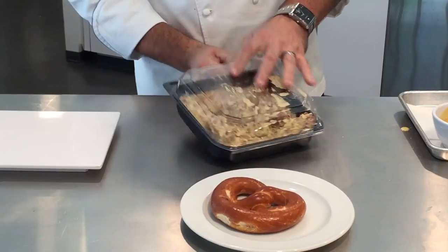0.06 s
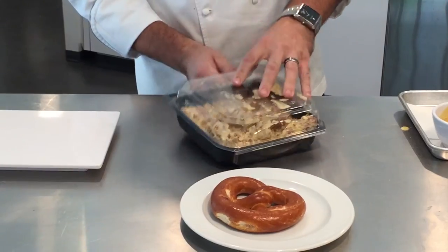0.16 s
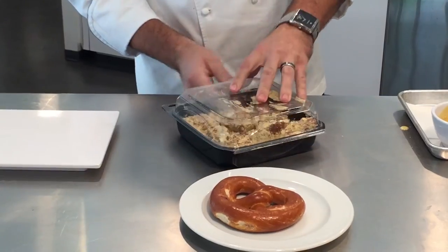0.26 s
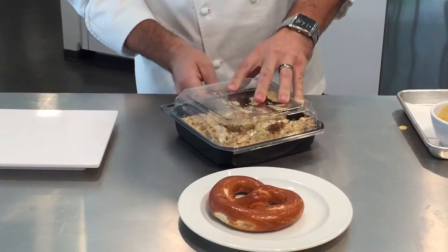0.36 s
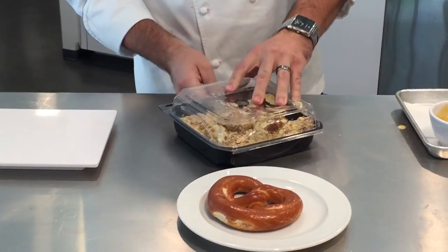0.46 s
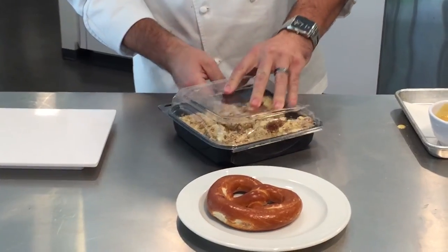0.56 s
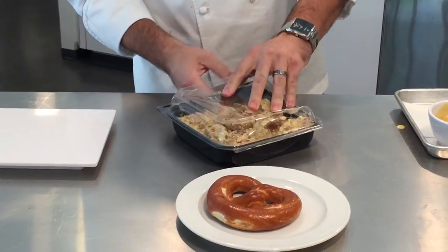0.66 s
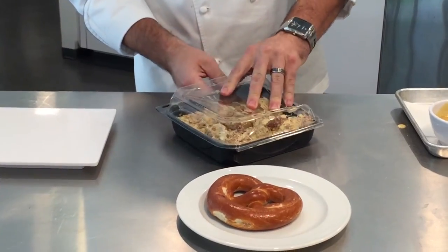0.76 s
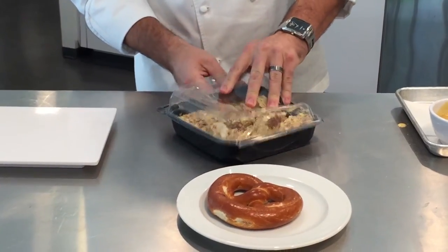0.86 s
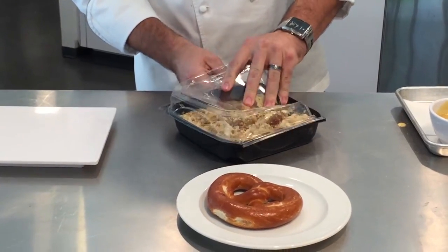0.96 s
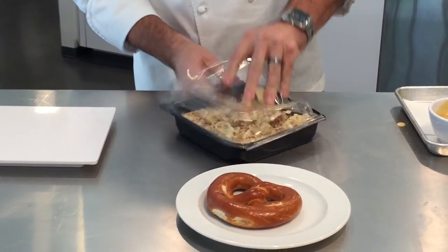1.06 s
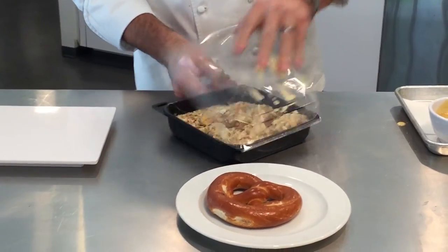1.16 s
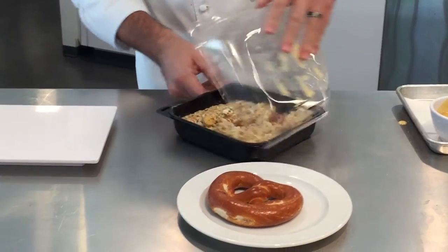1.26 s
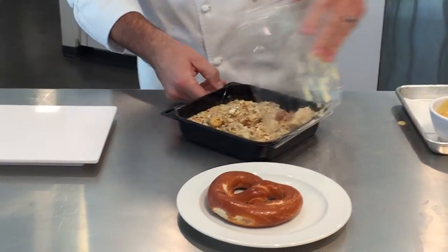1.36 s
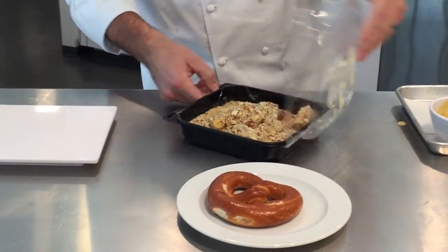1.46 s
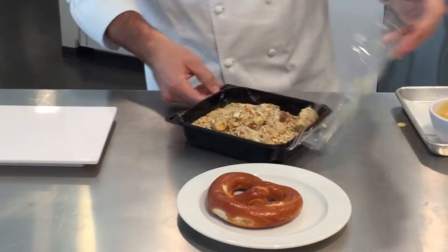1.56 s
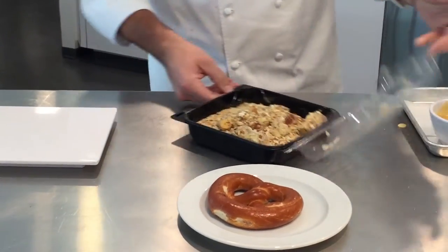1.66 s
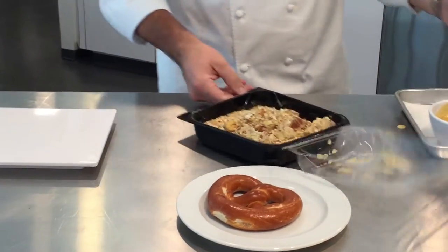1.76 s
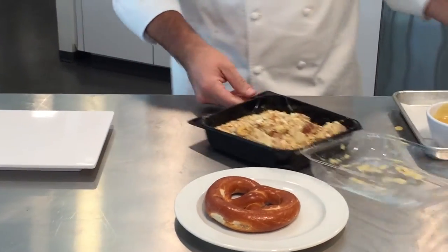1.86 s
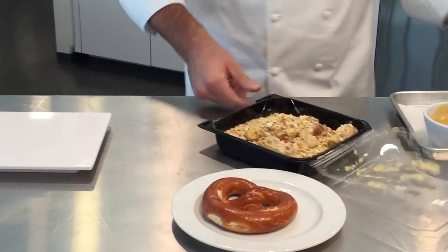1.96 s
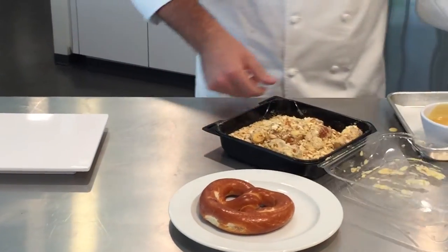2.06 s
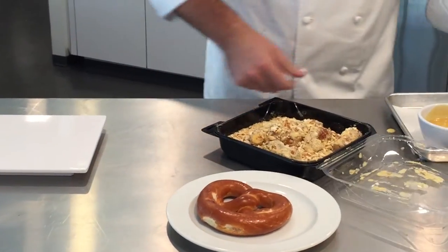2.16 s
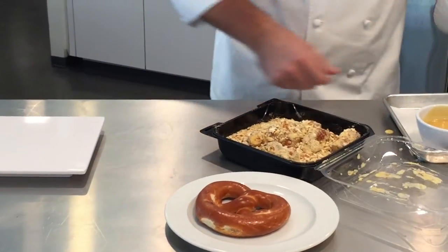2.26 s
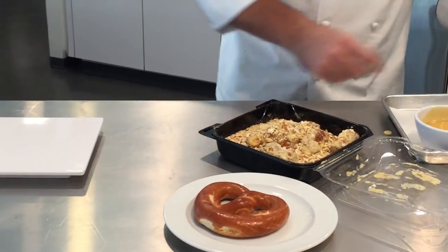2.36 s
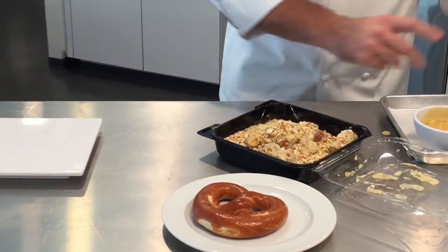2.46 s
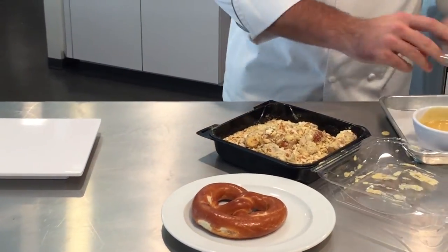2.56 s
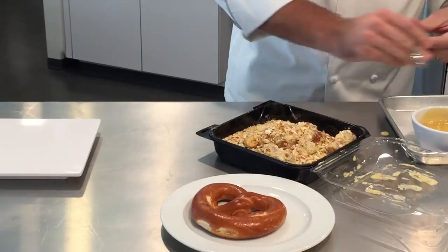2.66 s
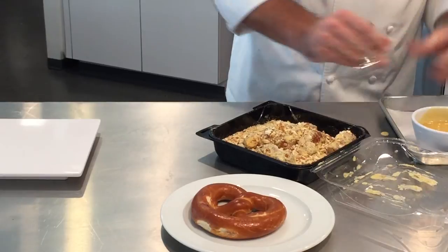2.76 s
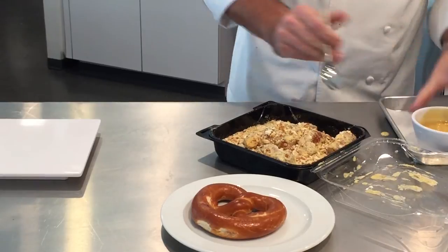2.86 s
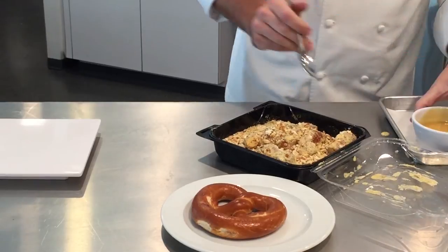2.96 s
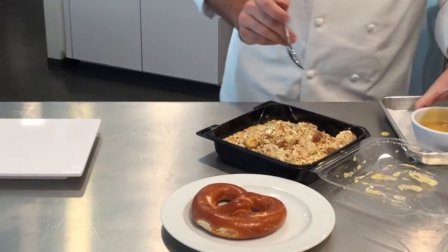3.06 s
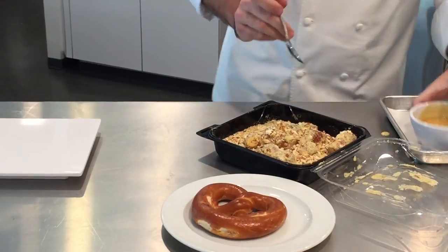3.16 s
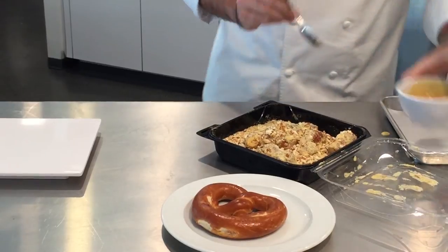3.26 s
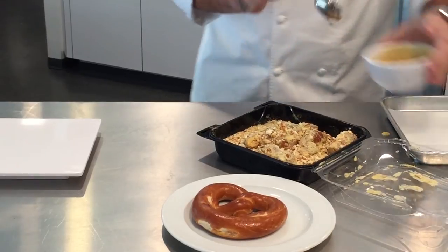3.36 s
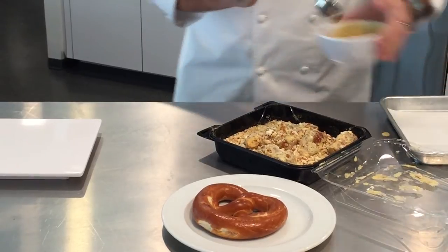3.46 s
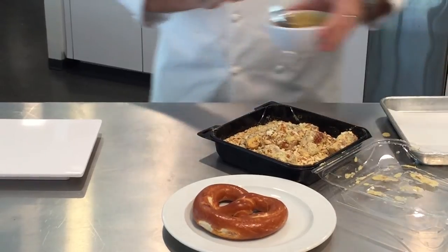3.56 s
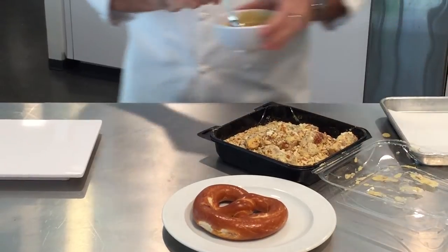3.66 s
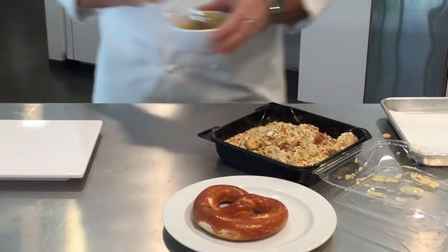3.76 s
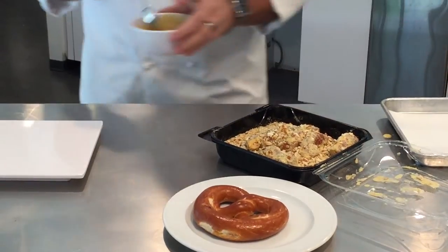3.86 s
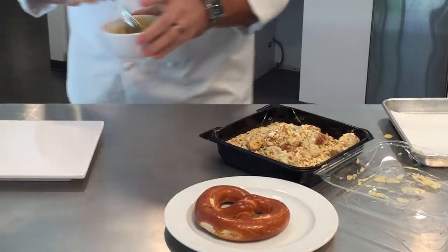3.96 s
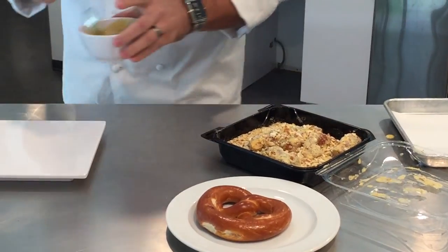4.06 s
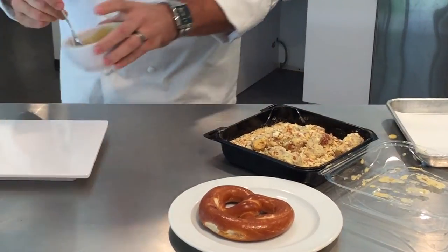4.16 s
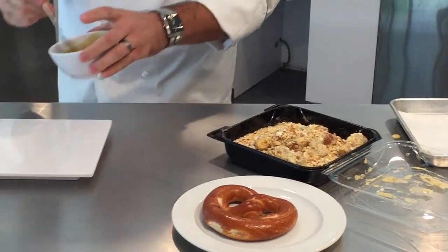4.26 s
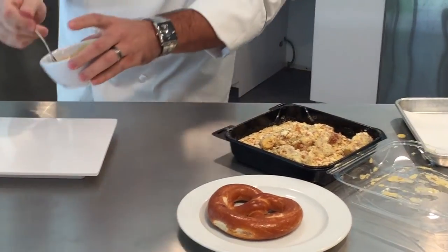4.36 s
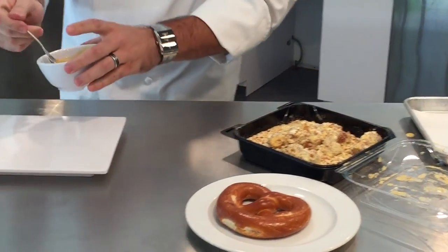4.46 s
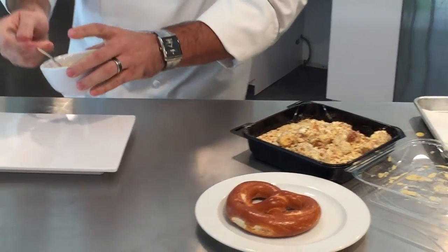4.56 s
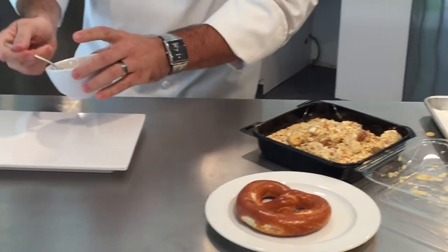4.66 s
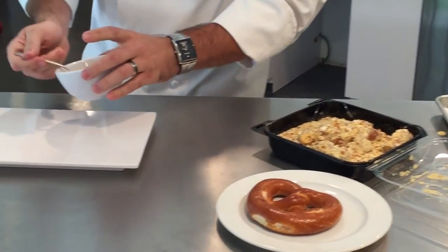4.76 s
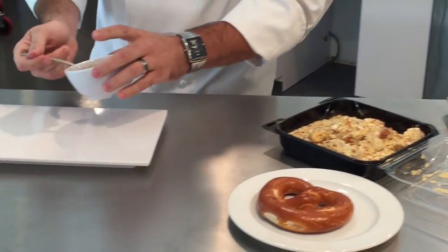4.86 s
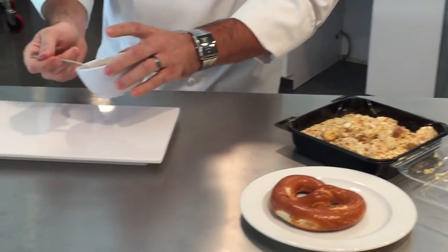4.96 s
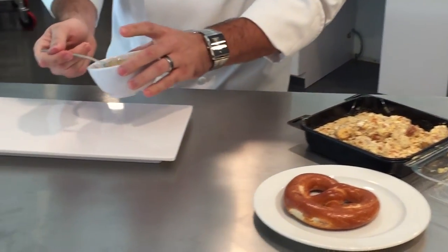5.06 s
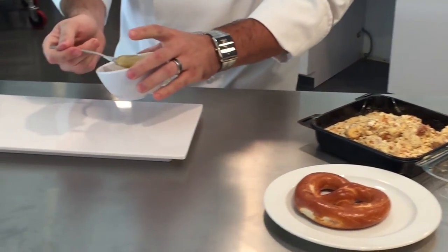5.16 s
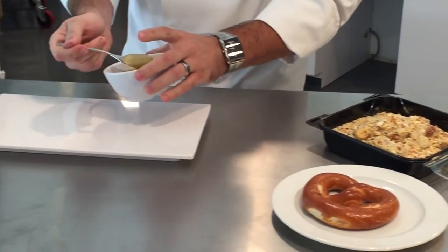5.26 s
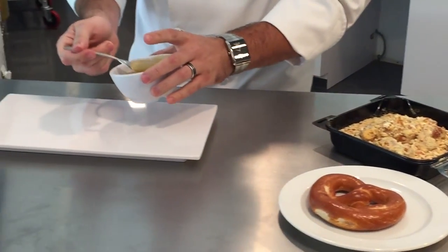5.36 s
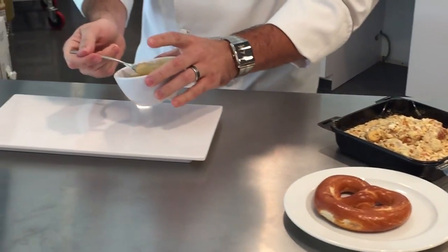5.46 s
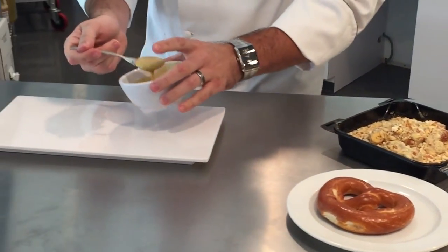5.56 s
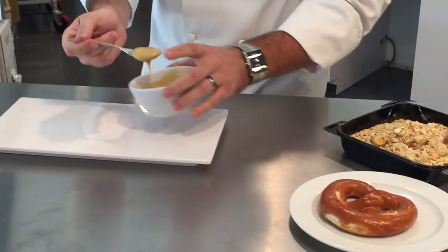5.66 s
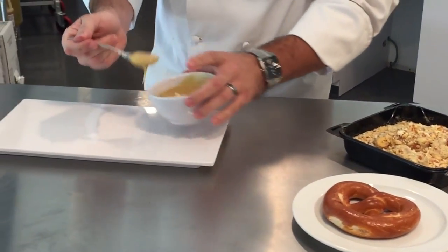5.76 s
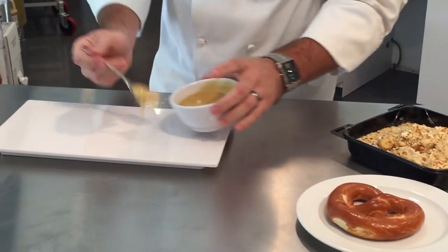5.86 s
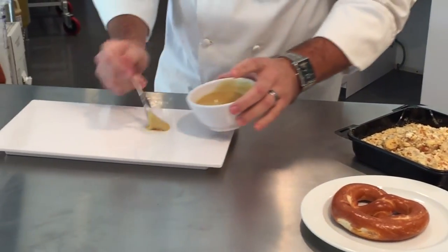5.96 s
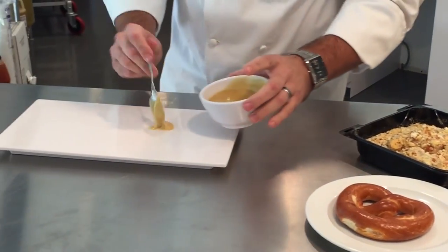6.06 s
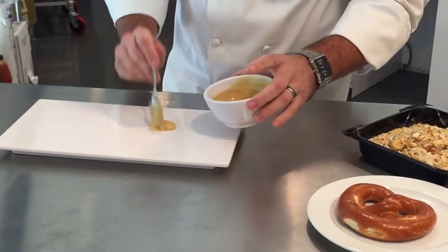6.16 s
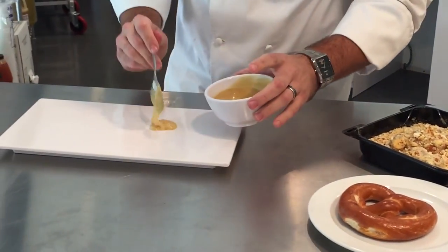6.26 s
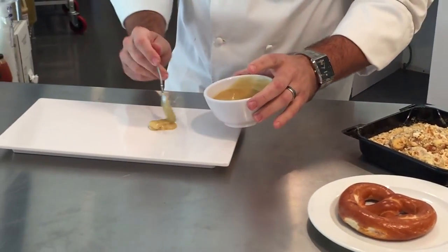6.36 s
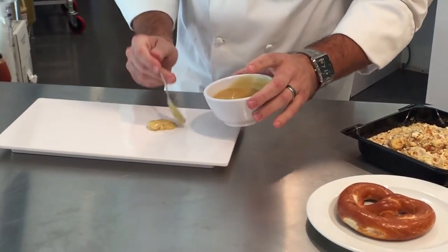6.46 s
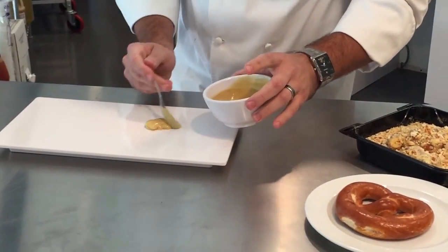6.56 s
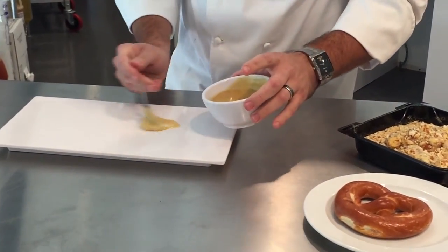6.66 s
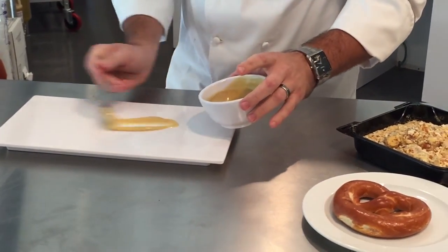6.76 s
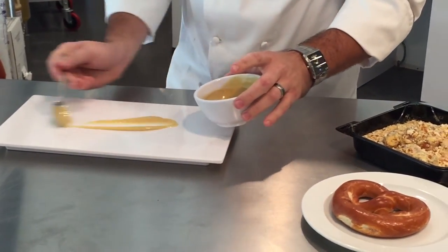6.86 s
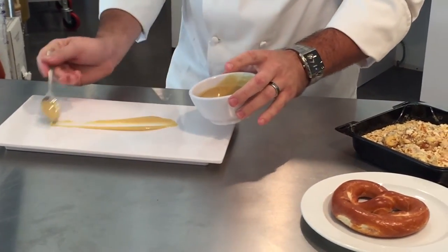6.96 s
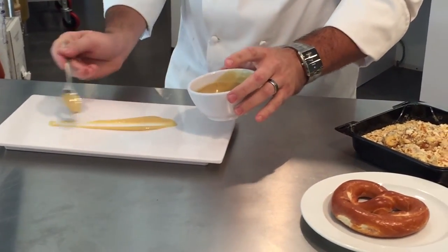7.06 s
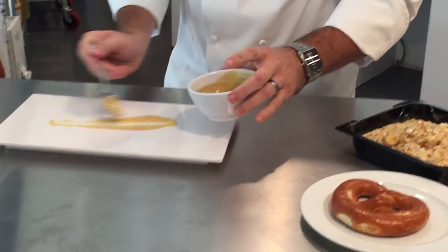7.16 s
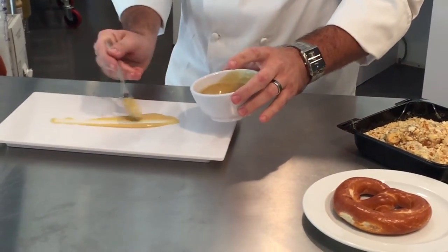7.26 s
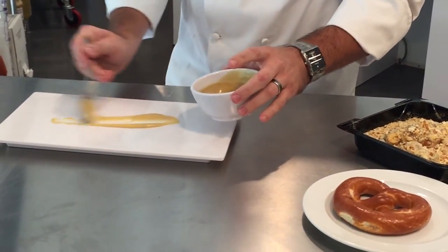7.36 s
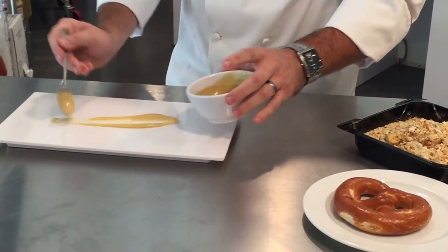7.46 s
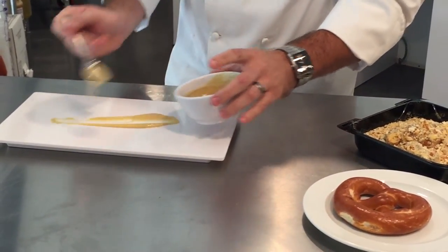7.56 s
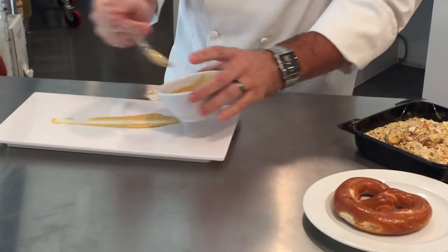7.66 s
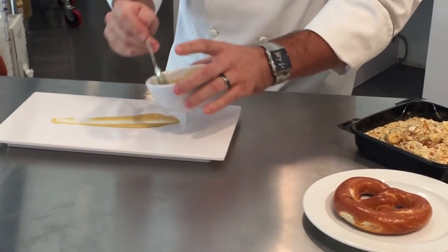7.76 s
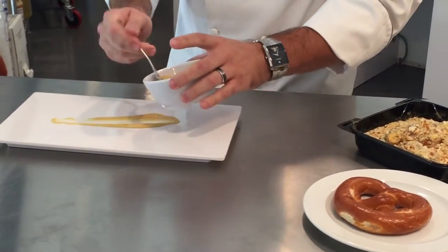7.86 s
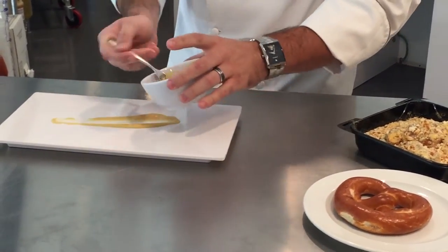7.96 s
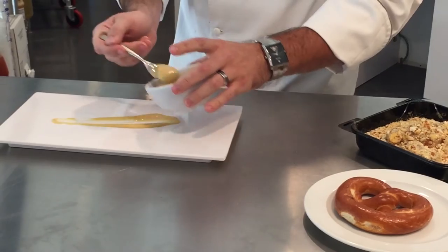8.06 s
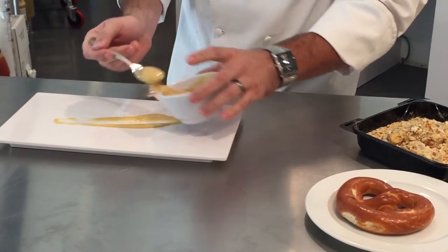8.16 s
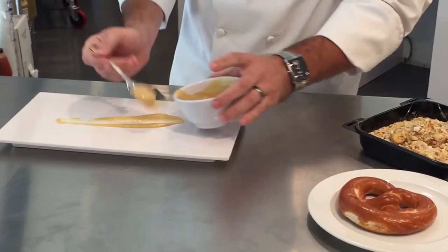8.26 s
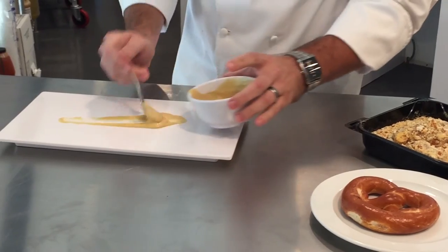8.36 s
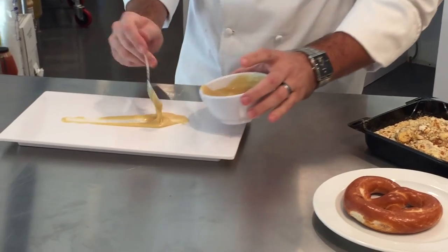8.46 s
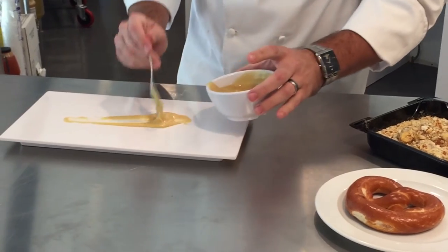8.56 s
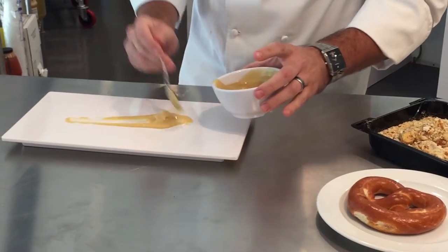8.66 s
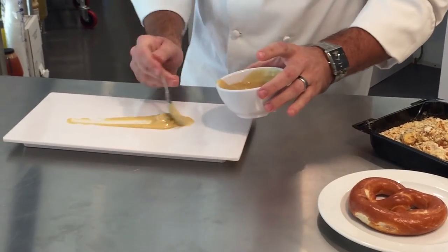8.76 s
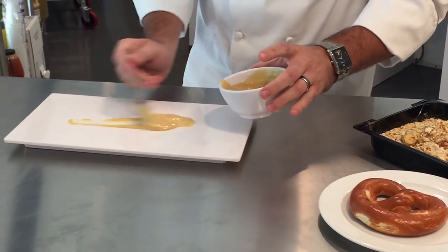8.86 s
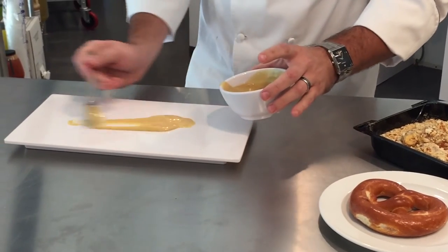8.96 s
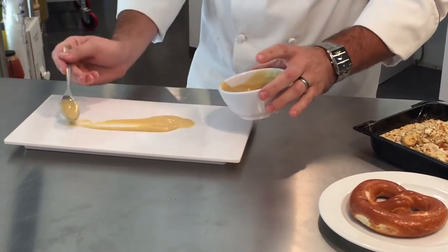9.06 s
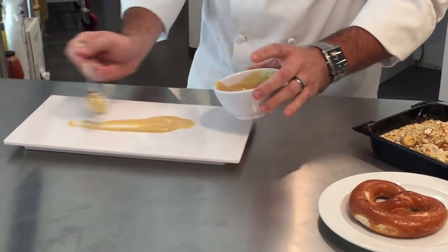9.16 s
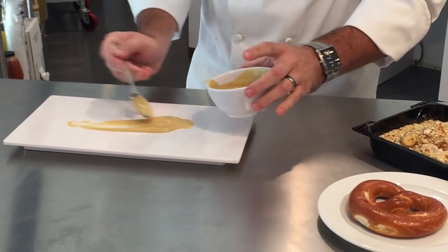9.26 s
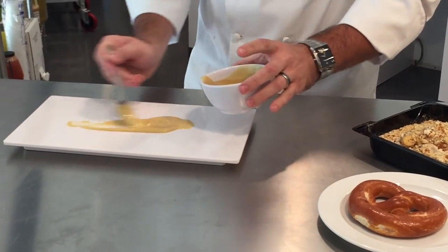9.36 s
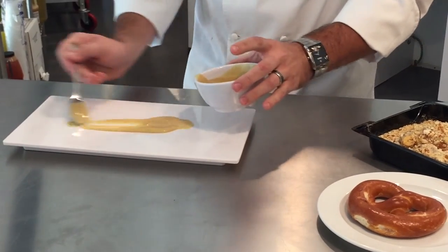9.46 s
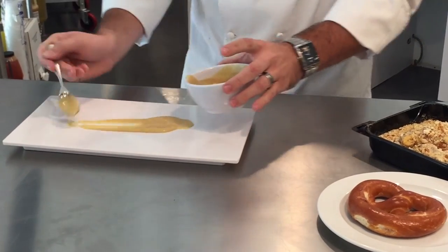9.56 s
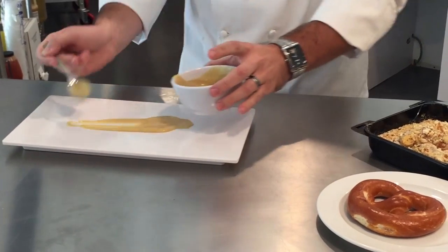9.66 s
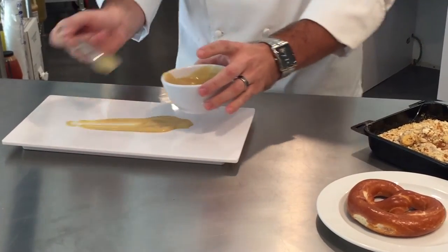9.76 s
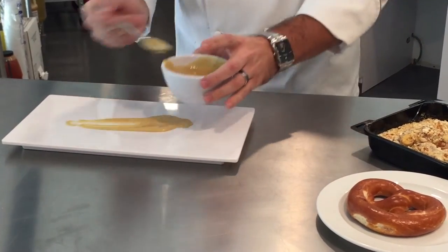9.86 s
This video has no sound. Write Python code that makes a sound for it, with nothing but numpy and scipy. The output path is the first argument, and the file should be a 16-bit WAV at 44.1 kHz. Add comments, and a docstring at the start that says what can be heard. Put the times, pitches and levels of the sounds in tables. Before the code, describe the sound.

Close-miked handling on a steel counter: brittle plastic crinkles, a burst of dry snaps as a tub lid comes free, then a light clatter and brief skid as it lands. Next come a few short metal-on-ceramic clinks, a long near-quiet stretch, a strong double spoon knock on crockery, and later softer taps. Steady low-level airy ventilation with a faint motor hum fills the reflective kitchen throughout.

```python
"""Plastic lid and crockery in a hard-walled kitchen

Close to the microphone a plastic lid is prised off a food tub, dropped on a steel counter and slides;
then a spoon clinks in a ceramic bowl, knocks on crockery and scrapes. Each blow is a rough contact that
rings decaying modes; creases are random ticks, slides are narrow bands of friction noise. Counter,
cupboards and far walls answer with decaying noise; ventilation hums and hisses behind it all."""
import sys
import numpy as np
from scipy import signal
from scipy.fft import rfft, irfft
from scipy.io import wavfile
from scipy.ndimage import uniform_filter1d

SR = 44100
rng = np.random.default_rng(int(sys.argv[2]) if len(sys.argv) > 2 else 0)


def file_out(sig):
    """Save sig as 16-bit WAV at sys.argv[1]."""
    # one column per channel
    cols = np.atleast_2d(sig).T
    # limit, then scale
    lim = np.clip(cols, -1, 1)
    pcm = np.round(lim * 32767).astype(np.int16)
    wavfile.write(sys.argv[1], SR, pcm)


N = 436590

# Ventilation air: (frequency [Hz], relative density [dB]); its overall level [dB rms]
AIR_SPECTRUM = [(18, -93), (30, -62.5), (92, -25.5), (132, -8.5), (247, -1.5), (374, -6), (460, -5.5),
                (612, -7.5), (837, -9.5), (1000, -12.5), (1340, -10.5), (2430, -17.5), (6530, -27),
                (8690, -31), (15000, -56)]
AIR_DB = -61.5
# Ventilation motor tones: (frequency [Hz], level [dB rms])
MOTOR_TONES = [(468, -68), (815, -73.5)]
# Hands flexing the lid, a dense crackle: (time [s], gain [dB])
CRACKLE_CURVE = [(0.0, -76), (0.17, -75), (0.29, -66.5), (0.368, -57.5), (0.498, -106), (0.67, -56),
                 (0.7, -90), (1.03, -91), (1.07, -73), (1.176, -65), (1.5, -74), (1.602, -55.5),
                 (1.748, -65), (1.95, -61), (2.116, -77), (2.2, -79)]

# Blows on each thing, levels before the room answers: (time [s], peak [dB], crack against the ring [dB],
# thud against body band [dB], click against body band [dB], edge against click [dB], favoured modes [Hz]...)
LID_SNAPS = [(0.054, -50.5, 3, 5, 1, -7, 456, 2804), (0.179, -33.5, 0.5, -17, -5, -8, 1030, 1588),
             (0.212, -40.5, 2, -14.5, 3.5, -8, 1177, 3150), (0.23, -45.5, 3, 0, 2, -7.5, 951.5, 3150),
             (0.257, -43, 1.5, 2, 3, -7.5, 898, 3150), (0.447, -35, -2.5, 5.5, -8, -7, 511, 900),
             (0.678, -22, 4.5, -5, 8.5, -7, 1855, 3150),
             (0.6795, -13, 5.5, 0.5, 9, -7.5, 507.5, 1855, 5040), (0.736, -25, 4, -9, 6, -6, 3150, 4300),
             (0.738, -18, 4, -5, -7, -8, 510, 1150, 1545), (0.774, -27.5, 1.5, -2, -8, -14, 597, 1800),
             (0.877, -18, 1.5, -14, -5, -8, 1540, 3150), (0.88, -14.5, 2.5, -11, 0.5, -8, 1052, 3700),
             (0.922, -19, 4, -8, 3, -7.5, 950, 3150), (0.924, -18.5, 3, 0, -4, -9, 615, 950),
             (1.02, -38, 4, -2, -14, -7.5, 610, 1550)]
TUB_SHIFTS = [(0.39, -49, -14, 0, -12, -4.5, 340, 494), (0.45, -32, 5, 6.5, -17, -11, 477, 1020),
              (0.458, -50, -7, -20.5, -17.5, 5, 520, 990), (0.499, -55, -15, 18, 4.5, -20, 510, 339),
              (0.529, -58, -9, 0, -3, -4.5, 490, 1000), (1.032, -41.5, -7, 11, -20, -15, 610, 524),
              (1.612, -37, -9, -7, -30, 2, 1150, 600), (1.679, -44, -10, -21, -30, 5, 980, 1100)]
LID_DROPS = [(1.545, -49, -6, 14, 3, -2, 336, 5700), (1.577, -48, 0, -10, -6, -9, 1706, 2040),
             (1.603, -25, -10, -26, -6.5, -5.5, 2040, 2698), (1.649, -42, 0, 0, -1, -6, 1020, 2710),
             (1.749, -49, 3, -30, 4, -3, 4470, 2340), (1.754, -46, -3, -30, -3, -6, 2040, 4470),
             (1.774, -53, 3, -26, -15, -5.5, 1140, 2040), (1.822, -44, 0, -17, -4, -6, 1140, 1706),
             (1.832, -36.5, 0, -35, -1, -3, 2340, 1140, 5100), (1.924, -38, 0, 0, -8, -9, 824, 1450, 3420),
             (1.946, -47, 5, -7, 2, -4, 818, 4470), (1.985, -53, 1, -10, 0, -9.5, 2040, 2710),
             (2.075, -39, 0, -2, -7, -11, 830, 1450, 3420), (2.098, -45, -3, -10, -12, -10, 1450, 830),
             (2.128, -51.5, 5, 3, -20, -13, 823, 1450)]
BOWL_CLINKS = [(3.733, -32.5, -6, -25, -12, -4, 1130, 2550), (3.741, -36, -14, -22, -14, -3, 1030, 2550),
               (3.916, -30.5, 1, -17, 13, 0, 4390, 6330, 1030), (3.922, -42, 2, -24, 20, 3, 7980, 9000),
               (3.927, -43, 2, -24, 20, 1, 4130, 4650, 9200),
               (3.947, -34.5, -16, -19, -8, -12, 1030, 3850, 4130),
               (4.155, -48, -8, -14, -5.5, -1, 1790, 3200), (4.347, -54.5, -2, -20, -3, -1, 1790, 2900),
               (4.515, -55, -8, -4, 5, -2, 4390, 9200), (9.863, -48.5, -5, -16, -2.5, -1, 1430, 4150)]
PLATE_KNOCKS = [(5.746, -28, -3, 0, 3, -6, 1555, 7760, 2900), (5.751, -28, -3, 2, 3.5, -8, 757, 1715, 4580),
                (5.93, -24, 12, -4, 6.5, -11, 1715, 2780, 380),
                (5.932, -16.5, 12, -7, 6.5, -13, 1715, 3250, 775),
                (5.934, -18, 14, -12, 6.5, -11, 2300, 6980, 3800),
                (7.122, -60, -10, -3, 4, -18, 4290, 4580, 5050),
                (8.153, -52, -15, 6, -9, -6, 766, 4240, 680), (8.53, -35, -11, -1, 5, -5, 2780, 4050, 7500),
                (8.534, -33.5, -15, 2, 4.5, -6, 690, 1150, 2900, 8070),
                (8.556, -46, -15, 6, 0, -4, 774, 5050, 4580)]
# Edges of the thud, body, click and edge bands: (frequency [Hz])
BLOW_EDGES_HZ = np.array([280, 900, 2100, 5400, 12000])

# Modes of each thing: (centre of a close pair [Hz], relative level [dB], t60 before limits [s])
LID_MODES = [(335, 1.5, 0.1), (510, 5, 0.061), (610, 2, 0.045), (741, 6, 0.012), (950, 2, 0.04),
             (1030, 3.5, .04), (1150, 2, 0.035), (1545, 1.5, 0.02), (1830, 0.5, 0.025), (2000, 0, .02),
             (2409, -0.5, 0.015), (2790, 0.5, 0.02), (3150, 1.5, 0.01), (3671, -4.5, 0.01),
             (4300, -4, 0.01), (5040, 0.5, .025), (6070, -1, 0.03), (7076, -8, 0.0092), (7600, -5, 0.018),
             (8300, -3, 0.014), (9600, -9.5, .015)]
LID_ON_STEEL_MODES = [(340, -3, .12), (594, -4, .08), (824, -6, .08), (1020, 0, 0.054), (1140, 1, 0.084),
                      (1450, -10.5, 0.036), (1706, 5, 0.046), (2040, 6, 0.023), (2340, 3.5, 0.019),
                      (2710, 2.5, 0.02), (3420, -8, 0.028), (4470, -6, 0.022), (5100, -1, 0.02),
                      (5700, -6, 0.02), (6900, -6, 0.019), (7600, -16, 0.023), (9200, 7, 0.018)]
BOWL_MODES = [(818, -20, 0.1), (1030, 9.5, 0.032), (1130, 2, 0.025), (1394, -3.5, 0.055),
              (1640, 0.5, 0.061), (1790, -2, .07), (2330, 1.5, 0.046), (2530, 4.5, 0.1), (2900, 0, 0.1),
              (3190, -1.5, 0.06), (3850, -2, .05), (4130, 3, 0.051), (4385, 2.5, 0.05), (4650, -1, .04),
              (4950, 2, 0.1), (5360, -2, .08), (5970, 1, .1), (6360, 4, 0.045), (7200, -7, 0.1),
              (7300, 1, 0.1), (7980, 4.5, 0.1), (8230, -9, .1), (9000, 6, 0.1), (9200, -3, 0.1),
              (10900, -12, .05), (11900, -5, 0.1)]
PLATE_MODES = [(380, -10.5, 0.07), (552, -9, 0.049), (680, -6, 0.077), (732, -7, 0.076), (774, -4, 0.07),
               (922, -10.5, .04), (1150, -6, 0.068), (1260, -11.5, .04), (1430, -9.5, 0.046),
               (1555, -5, 0.038), (1715, -4, 0.065), (2265, -8, 0.05), (2390, -8.5, 0.037),
               (2780, -7.5, 0.068), (2900, -5.5, 0.066), (3250, -10.5, 0.05), (3800, -8.5, .05),
               (4050, -7, .035), (4290, -6.5, .035), (4580, -4.5, .03), (5050, -6, 0.07), (5080, -6, 0.04),
               (6130, -14, .04), (6950, -12, .03), (7500, -2.5, .04), (7660, 0.5, .04), (7900, -1, .04),
               (8320, -4, .03), (8570, -8, .03)]

# Kinds of touch: (contact [ms], lowest pitch of the crack [Hz], wash [ms], broad wash [dB],
# wash around the modes against the ring [dB], grating against the clean strike [ratio],
# lift of the favoured modes [dB], loss at 10 kHz [dB])
SNAP_TOUCH = (0.75, 130, 5, -4.5, -12, 0.36, 6.5, 7.5)
SHIFT_TOUCH = (3, 150.5, 6.5, -2, -8, 3.0, 7, 9)
DROP_TOUCH = (1.4, 500, 4, -2, -9, 0.1, 11.5, 5.5)
CLINK_TOUCH = (0.4, 1000, 7, -11, -10, 0.1, 11, 6.5)
KNOCK_TOUCH = (0.36, 449.5, 12.5, -3, -8, 0.32, 7.5, 11)

# Friction bands of the sliding things: (frequency [Hz], width [Hz], gain [dB])
LID_SLIDE_BANDS = [(1930, 60, 5), (2450, 150, -5), (2950, 150, -3), (4800, 100, -11)]
SPOON_SCRAPE_BANDS = [(2900, 120, -2), (3530, 150, 5), (4150, 70, 13.5), (4700, 200, -8), (7100, 500, -6)]
# Course of each slide: (peak time [s], level [dB], rise [dB per s], fall [dB per s])
LID_SLIDE = (2.032, -55, 110, 700)
SPOON_SCRAPE = (7.195, -61, 250, 250)

# Room bands, levels before a weighting by pitch:
# (frequency [Hz], near surfaces [dB], far walls t60 [s], far walls [dB])
ROOM_BANDS = [(233.5, -12, 0.26, -7.5), (499.2, -7.5, 0.28, -12.5), (1069, -15, 0.8, -21),
              (2000, -16.5, 0.31, -14.5), (4140, -15, 1, -26.5), (7660, -7, 0.91, -20),
              (13000, -12, 0.2, -16.5)]

# cycles that limit a mode's ring, though never to less than 12 ms:
# thin plastic in the hand, let go, hand-held bowl, plate lying flat
PLASTIC_CYCLES, DROP_CYCLES, BOWL_CYCLES, PLATE_CYCLES = 26, 60, 260, 200
# reach of the lift around a favoured mode, as a share of its pitch
PLASTIC_FAVOUR, CROCKERY_FAVOUR = 0.06, 0.035
PAIR_SPLIT = 0.0055  # shift of each mode of a pair up or down, as a share of its pitch
BLUR_T60_S = 0.008  # neighbours of each mode die at least this fast, widening it into a band
NEAR_T60_S = 0.18  # echo of counter and cupboards
TOP_HZ = 15300


def undb(db):
    """Amplitude ratio from decibels."""
    return 10 ** (np.asarray(db) / 20)


def level(x, db):
    """Scale to an rms level in dB."""
    return x * undb(db) / np.sqrt(np.mean(x ** 2))


def colour(x, hz, db):
    """Filter by (Hz, dB) points joined on a log-frequency axis."""
    log_hz = np.log(np.maximum(np.fft.rfftfreq(len(x), 1 / SR), 1))
    gain = undb(np.interp(log_hz, np.log(hz), db))
    return irfft(rfft(x) * gain, len(x))


def band(x, hz, width):
    """Keep one resonant band, its width in Hz."""
    return signal.lfilter(*signal.iirpeak(hz, hz / width, fs=SR), x)


def walk(rate):
    """Random levels held 1 / rate s and slewed twice; spread near 1."""
    hold = int(SR / rate)
    steps = np.repeat(rng.standard_normal(N // hold + 1), hold)
    return 1.6 * uniform_filter1d(uniform_filter1d(steps, hold), hold)[:N]


def curve_gain(curve):
    """Gain from a level curve, silent outside it and smoothed over 10 ms."""
    t = np.arange(N) / SR
    db = np.interp(t, *np.transpose(curve), left=-200, right=-200)
    return uniform_filter1d(undb(db), size=441)


def ventilation():
    """Air noise that swells a little, with two wavering motor tones."""
    air = colour(rng.standard_normal(N), *np.transpose(AIR_SPECTRUM)) * undb(0.7 * walk(1.5))
    sound = level(air, AIR_DB)
    t = np.arange(N) / SR
    for hz, db in MOTOR_TONES:
        tone = np.sin(2 * np.pi * (hz * t + 0.08 * walk(5)))
        sound = sound + level(tone * undb(1.2 * walk(11)), db)
    return sound


def ring(modes, cycles, favoured_hz, favour_db, reach):
    """Answer of an object to one tap; the spot of contact favours modes near certain pitches."""
    # uneven walls split every mode into a close pair
    hz, db, t60 = np.repeat(modes, 2, axis=0).T[:, :, None]
    t = np.arange(SR // 8) / SR
    level_chance, pitch_chance = rng.standard_normal((2, len(hz), 1))
    order = np.arange(len(hz))[:, None]
    nearness = np.exp(-(np.log(hz / favoured_hz) / reach) ** 2).max(axis=1, keepdims=True)
    db = db + favour_db * nearness + 1.5 * level_chance
    longest = np.clip(cycles / hz, 0.012, 0.1)
    t60 = np.clip(t60, 0.01, longest)
    hz = hz * (1 + PAIR_SPLIT * (-1) ** order + 0.003 * pitch_chance)
    sign = (-1) ** (order // 2)  # alternates from pair to pair
    return np.sum(undb(db - 60 * t / t60) * sign * np.sin(2 * np.pi * hz * t), axis=0)


def flexed_lid_crackle(per_s=2500, spread_db=2.6):
    """Tiny creases of thin plastic, each a tick into the lid."""
    strength = undb(spread_db * rng.exponential(size=N)) * rng.standard_normal(N)
    ticks = (rng.random(N) < per_s / SR) * strength
    answer = ring(LID_MODES, PLASTIC_CYCLES, [2400], 6.5, PLASTIC_FAVOUR)
    body = signal.fftconvolve(ticks, answer)[:N]
    body = colour(body, [120, 300], [-25, 0])  # too small to move deep bass
    snap = colour(ticks, [300, 2500, 9000, 13000], [-12, 0, -14, -34])
    return (level(body, 0) + level(snap, -2)) * curve_gain(CRACKLE_CURVE)


def share_out(x, shares_db, bass_cut_db, top_loss_db):
    """Colour a sound towards a given energy share in each band; it fades steeply outside."""
    power = np.cumsum(np.abs(rfft(x)) ** 2)[BLOW_EDGES_HZ * len(x) // SR]
    db = shares_db - 10 * np.log10(np.diff(power))
    middle = np.sqrt(BLOW_EDGES_HZ[1:] * BLOW_EDGES_HZ[:-1])
    bass = [db[0] - bass_cut_db, db[0] - bass_cut_db / 5]
    top = [db[-1] - top_loss_db, db[-1] - 2.4 * top_loss_db]
    return colour(x, [120, 300, *middle, 10000, 15000], [*bass, *db, *top])


def blows(events, modes, cycles, touch, hard=False):
    """Each blow is a rough contact that rings the modes and cracks broadly; softer contacts swell more slowly."""
    contact_ms, low_hz, wash_ms, wash_db, blur_db, grating, favour_db, top_loss_db = touch
    reach, bass_cut_db = (CROCKERY_FAVOUR, 34) if hard else (PLASTIC_FAVOUR, 20)
    crack_filter = signal.butter(2, low_hz, "high", fs=SR, output="sos")
    lead = SR // 50  # room ahead of each blow for the colouring
    out = np.zeros(N + SR)
    ms = np.arange(SR // 8) * 1000 / SR
    swell = ms * np.exp(-ms / max(contact_ms, 0.15))
    for s, peak_db, crack_db, thud_db, click_db, edge_db, *favoured_hz in events:
        contact, rattle = rng.standard_normal((2, len(ms)))
        # one clean strike plus some rough grating, most in the tub shifts
        strike = swell == swell.max()
        push = strike + grating * contact * swell / np.linalg.norm(swell)
        answer = ring(modes, cycles, favoured_hz, favour_db, reach)
        tone = signal.fftconvolve(push, answer)
        # countless small modes blur into a noisy wash after the contact
        wash = rattle * np.cumsum(swell) * np.exp(-ms / wash_ms)
        blur = signal.fftconvolve(wash, answer * undb(-0.06 * ms / BLUR_T60_S))
        crack = level(contact * swell, 0) + level(wash, wash_db)
        crack = np.pad(crack, (0, len(tone) - len(ms)))
        crack = signal.sosfilt(crack_filter, crack)
        sound = level(tone, 0) + level(blur, blur_db) + level(crack, crack_db)
        sound = np.pad(sound, (lead, 0))
        # each blow has its own thud, click and edge balance
        shares_db = np.array([thud_db, 0, click_db, click_db + edge_db])
        sound = share_out(sound, shares_db, bass_cut_db, top_loss_db)
        peak = np.sqrt(np.max(uniform_filter1d(sound ** 2, size=132)))  # loudest 3 ms
        i = int(s * SR)
        out[i:i + len(sound)] += sound * undb(peak_db) / peak
    return out[lead:N + lead]


def lid_snaps():
    """Thin plastic held in the hand snaps off the tub, its ring soon damped."""
    return blows(LID_SNAPS, LID_MODES, PLASTIC_CYCLES, SNAP_TOUCH)


def tub_shifts():
    """Slower, grating contacts ring the same damped plastic."""
    return blows(TUB_SHIFTS, LID_MODES, PLASTIC_CYCLES, SHIFT_TOUCH)


def lid_drops():
    """The lid, let go, knocks on the steel counter and may ring for more cycles."""
    return blows(LID_DROPS, LID_ON_STEEL_MODES, DROP_CYCLES, DROP_TOUCH)


def scrape(bands, peak_s, level_db, rise_db_per_s, fall_db_per_s):
    """Fine friction noise in narrow bands of the thing that slides."""
    grit = rng.standard_normal(N) * undb(2.1 * walk(85))
    after = np.arange(N) / SR - peak_s
    press = undb(np.minimum(rise_db_per_s * after, -fall_db_per_s * after))
    friction = sum(undb(db) * band(grit, hz, width) for hz, width, db in bands)
    return level(friction, level_db) * press


def lid_slide():
    """The lid slides briefly: friction in the lid's bands."""
    return scrape(LID_SLIDE_BANDS, *LID_SLIDE)


def bowl_clinks():
    """Hard, short contacts of a spoon ring the hand-held ceramic bowl."""
    return blows(BOWL_CLINKS, BOWL_MODES, BOWL_CYCLES, CLINK_TOUCH, hard=True)


def plate_knocks():
    """Hard knocks ring crockery lying flat, with a longer wash."""
    return blows(PLATE_KNOCKS, PLATE_MODES, PLATE_CYCLES, KNOCK_TOUCH, hard=True)


def spoon_scrape():
    """The spoon scrapes briefly: friction in higher narrow bands."""
    return scrape(SPOON_SCRAPE_BANDS, *SPOON_SCRAPE)


def room(x):
    """Diffuse echo, band by band: a quick one from counter and cupboards, a slow one from the far walls."""
    t = np.arange(SR * 3 // 4) / SR
    tail = 0
    for hz, near_db, far_t60, far_db in ROOM_BANDS:
        for db, t60 in (near_db, NEAR_T60_S), (far_db, far_t60):
            noise = band(rng.standard_normal(len(t)), hz, hz / 1.5) * undb(-60 * t / t60)
            noise = noise / np.sqrt(np.sum(noise ** 2))
            tail = tail + undb(db) * noise * np.sqrt(hz / 8000)  # wider bands weigh more
    onset = 1 - np.exp(-t / 0.002)
    return signal.fftconvolve(x, tail * onset)[:N]


def scene():
    """Close sounds and their room echo, over the ventilation."""
    plastic = flexed_lid_crackle() + lid_snaps() + tub_shifts() + lid_drops() + lid_slide()
    crockery = bowl_clinks() + plate_knocks() + spoon_scrape()
    close = plastic + crockery
    return (close + room(close) + ventilation())[None]


def record(dry):
    """The microphone loses the deep bass and the top is cut."""
    thin = signal.sosfilt(signal.butter(1, 30, "high", fs=SR, output="sos"), dry)
    return signal.sosfilt(signal.ellip(8, 0.2, 70, TOP_HZ, fs=SR, output="sos"), thin)


dry = scene()
out = record(dry)
file_out(out)
```